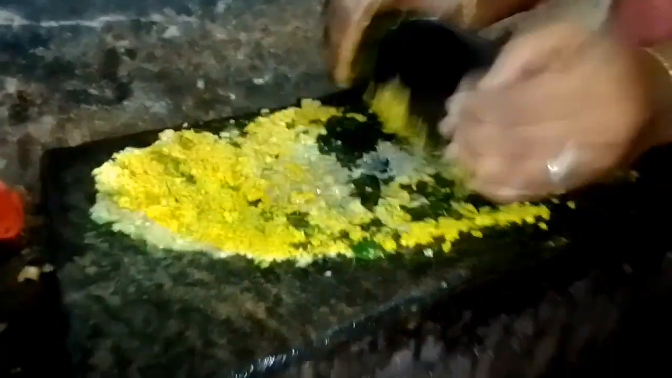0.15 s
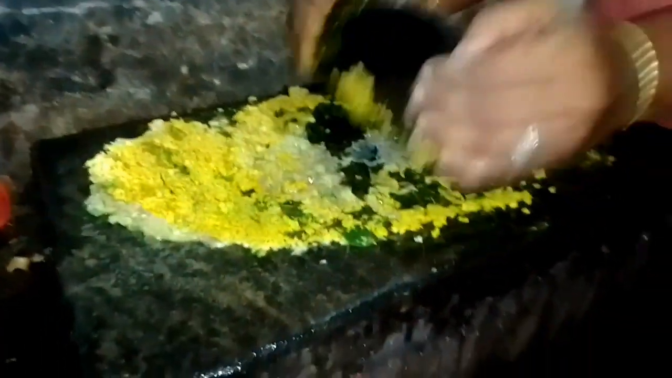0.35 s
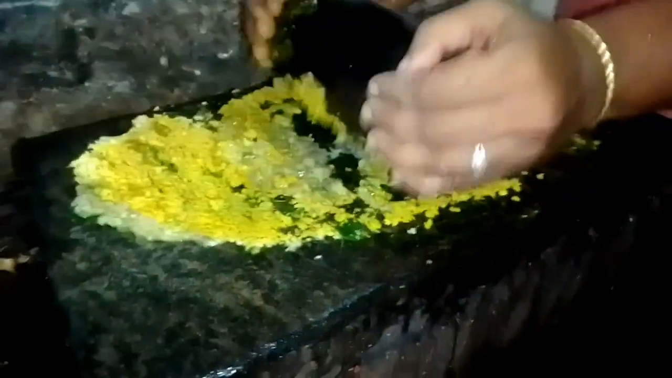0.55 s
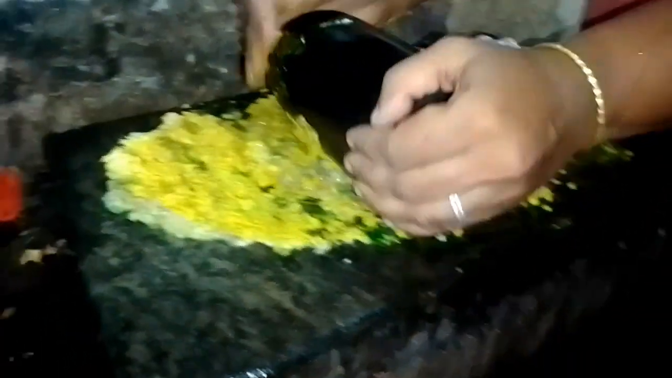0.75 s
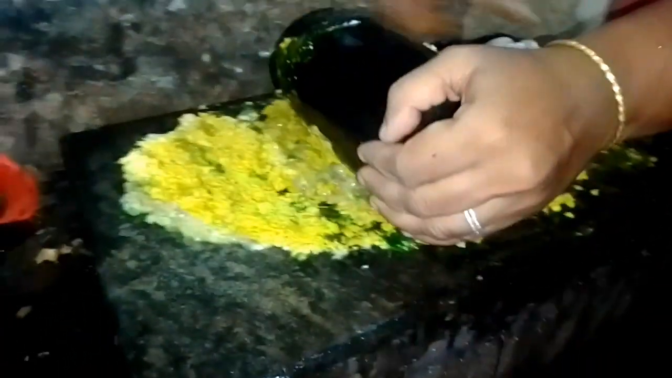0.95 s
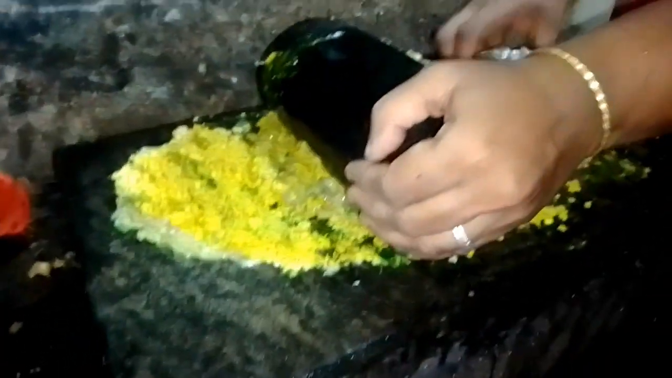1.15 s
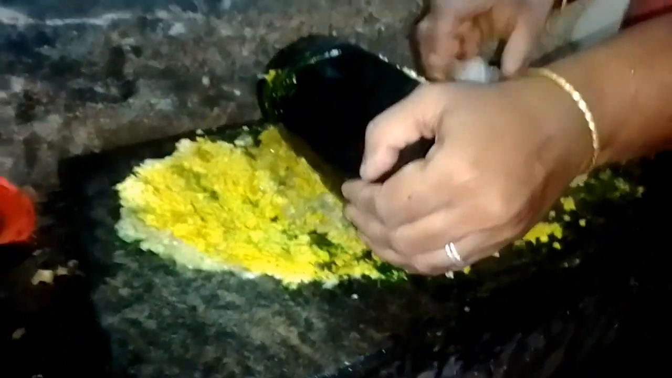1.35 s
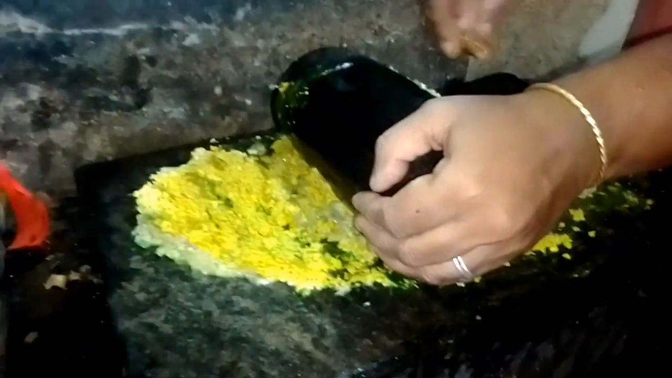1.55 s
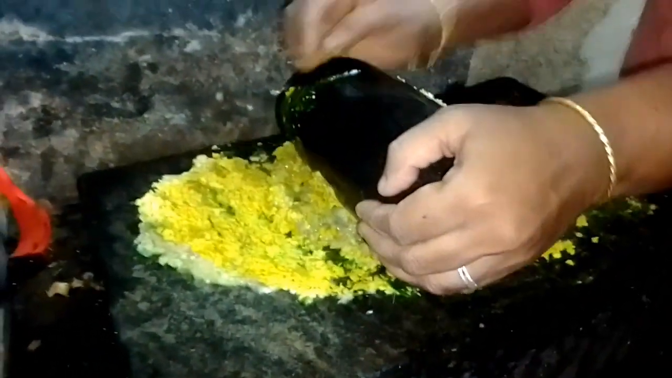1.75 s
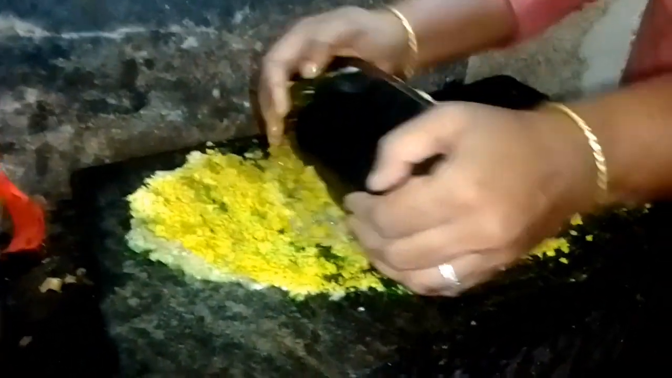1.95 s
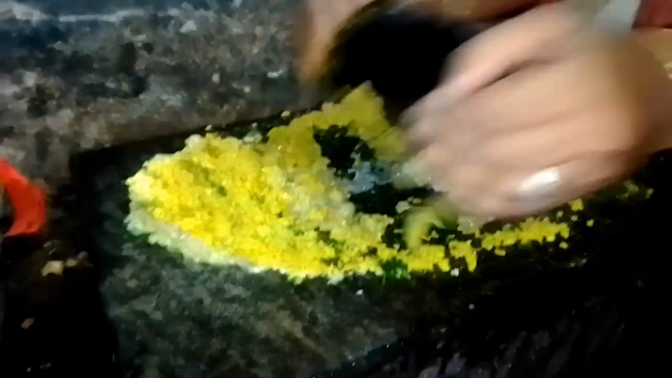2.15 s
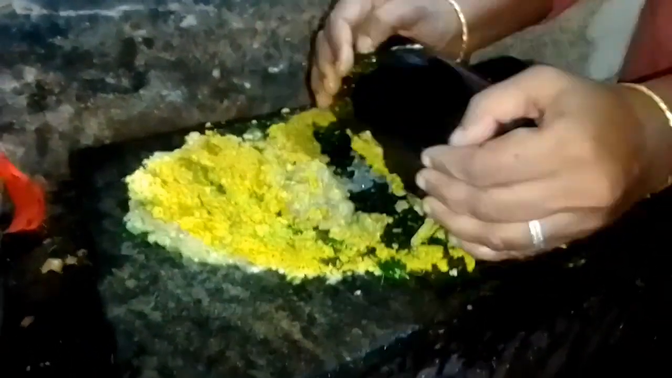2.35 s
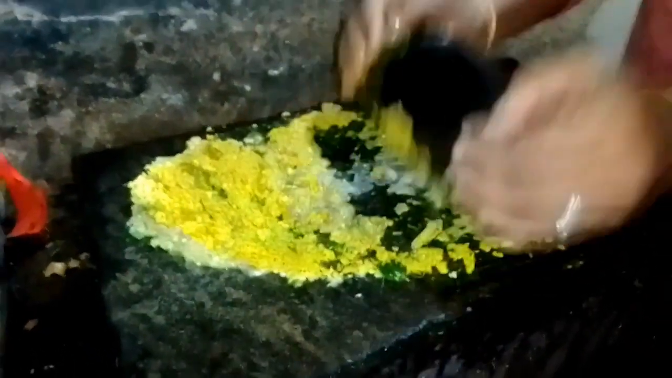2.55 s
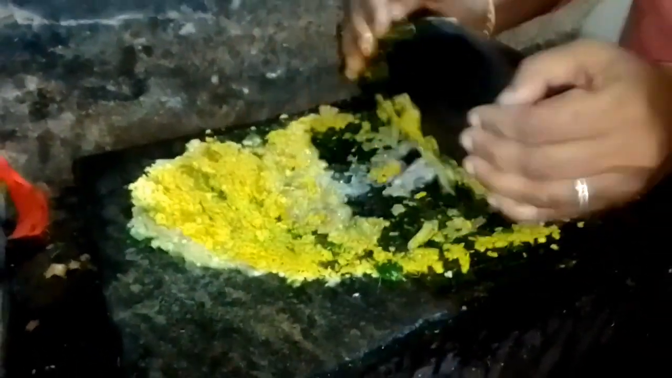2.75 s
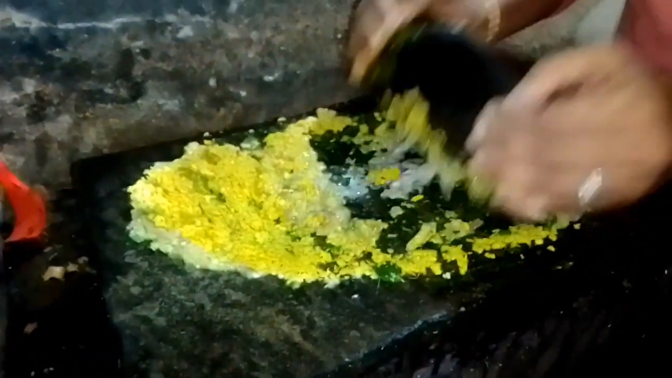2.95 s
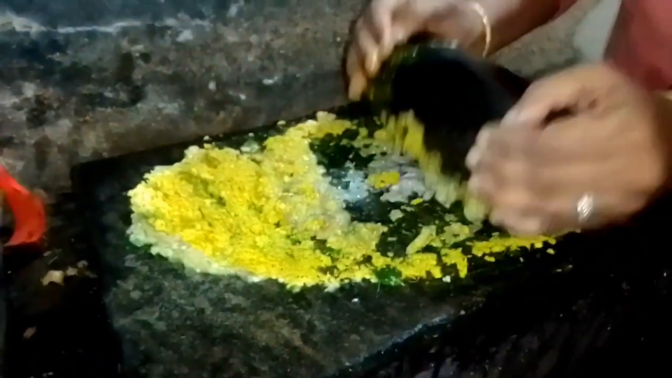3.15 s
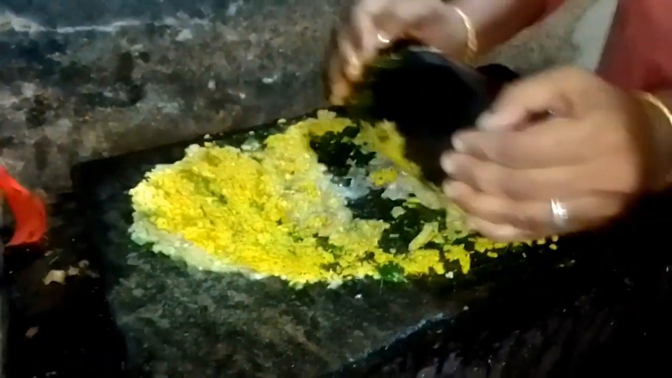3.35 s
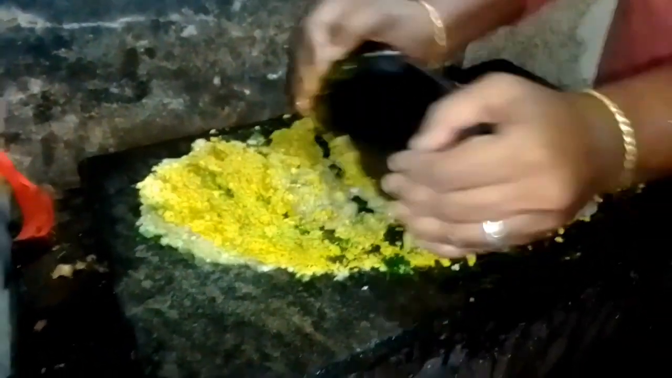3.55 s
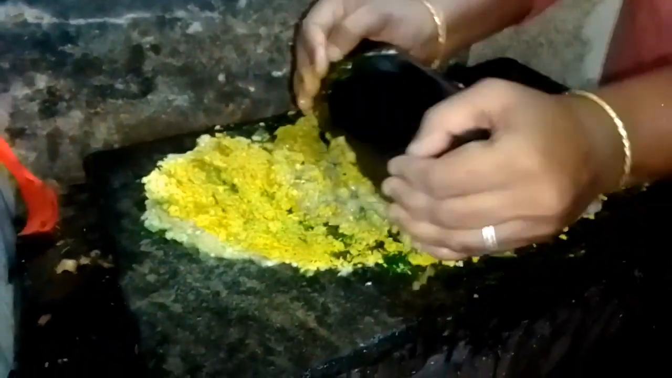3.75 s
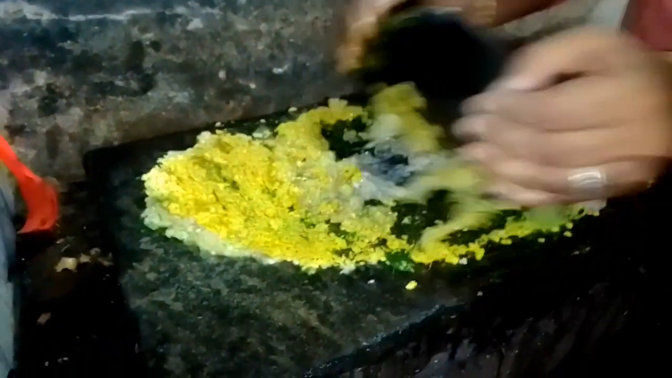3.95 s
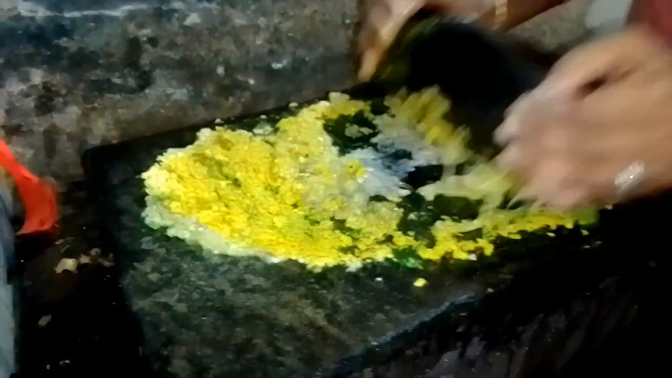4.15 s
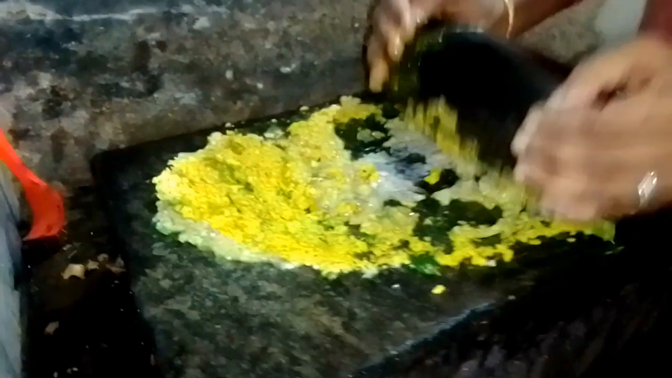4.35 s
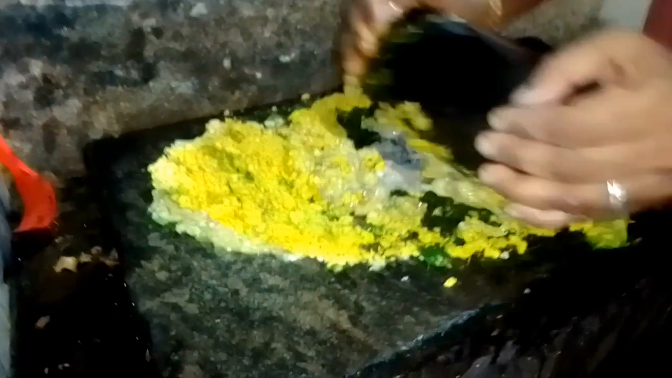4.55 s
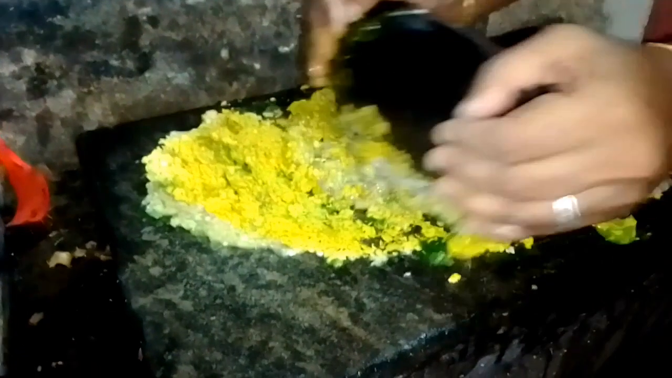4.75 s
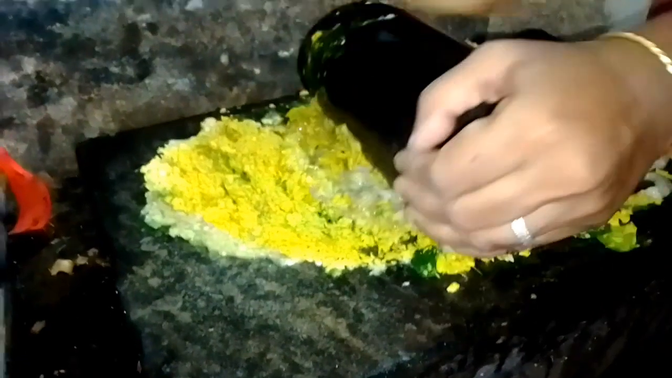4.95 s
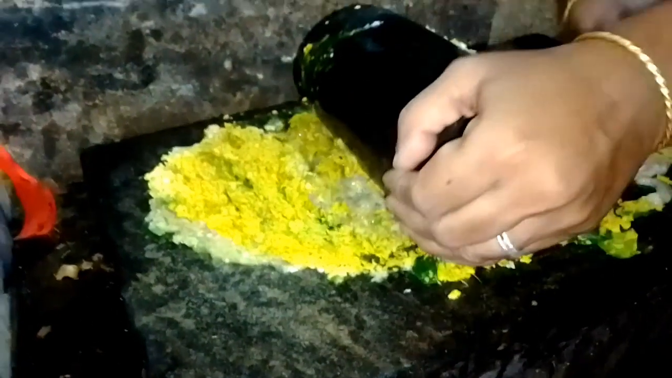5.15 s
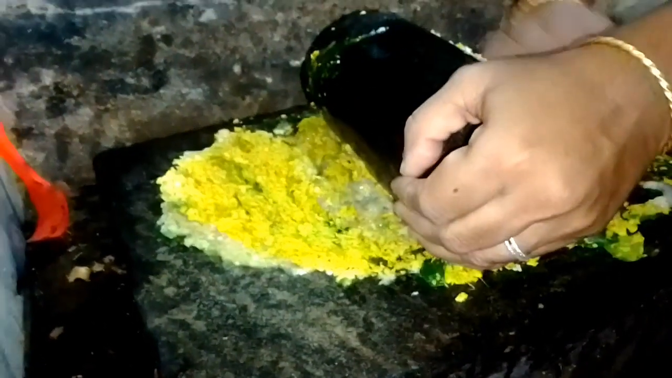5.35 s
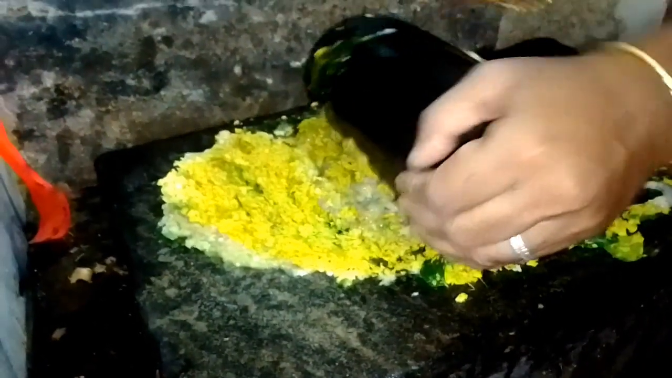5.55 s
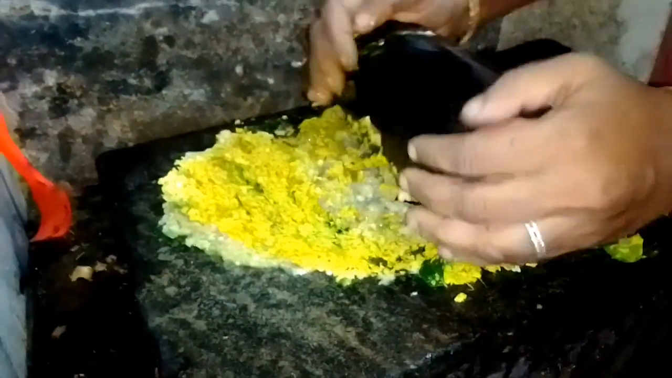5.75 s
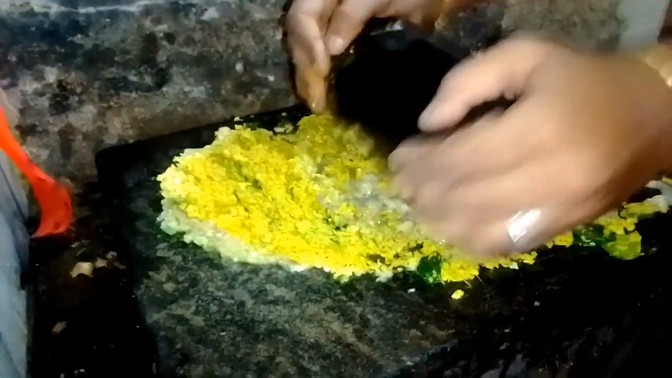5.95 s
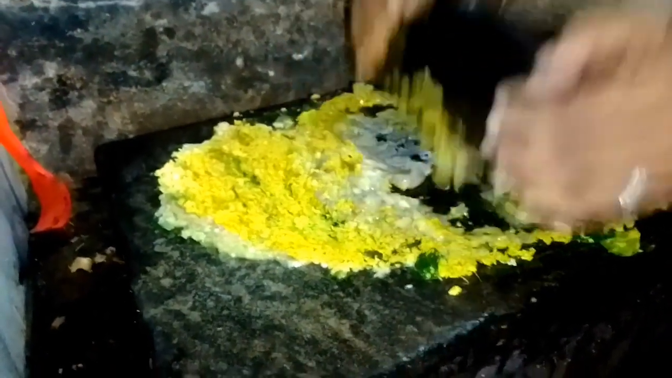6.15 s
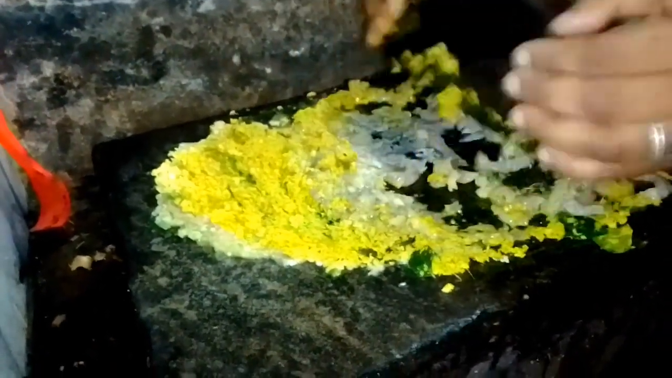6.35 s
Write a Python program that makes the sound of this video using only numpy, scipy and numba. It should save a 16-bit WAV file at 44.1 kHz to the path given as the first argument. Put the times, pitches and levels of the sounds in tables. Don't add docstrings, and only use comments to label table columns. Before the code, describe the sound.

A close, slightly boxy phone pickup in a small hard kitchen. A low, wavering pump-like hum and soft moving air stay behind throughout. At 0.1 s the pestle catches with a small gritty rattle, then taps at about 0.33, 0.56 and 0.8 s, each a short mid-pitched stone clack trailing into a juddering scrape. From 1 to 2.4 s it is quieter: wet paste rubbing, little crumb ticks, a thin palm squeak near 1.35. From 2.45 to 4.4 s taps return roughly every quarter second, strongest near 3.4 and 3.9, with skids and brief ringing. At 4.63 s one heavy blow, by far the loudest, booms hollowly through the slab with fast clattering rebounds, dying in under half a second. A lighter tap follows at 4.87, then soft rubs, a squeak around 5.4, sparse grainy snaps, and a faint double tap at 6.3 as the hum rises.

```python
import sys
import numpy as np
from scipy import signal
from scipy.fft import rfft, irfft
from scipy.io import wavfile
from scipy.ndimage import uniform_filter1d
from numba import njit

SR = 44100
rng = np.random.default_rng(int(sys.argv[2]) if len(sys.argv) > 2 else 0)


def generate_wav(signal):
    frames = np.transpose(np.atleast_2d(signal))
    scaled = np.clip(frames, -1, 1) * 32767
    pcm = np.round(scaled).astype(np.int16)
    wavfile.write(sys.argv[1], SR, pcm)


def volts_from_decibels(level):
    exponent = np.asarray(level, float) / 20
    return 10 ** exponent


N = 286209
T = np.arange(N) / SR

# (time [s], peak level [dB], ring [Hz], upper ring [Hz], treble [dB])
TAP_HITS = [(0.3346, -31.5, 1930, 2660, -14.5), (0.5607, -36, 1800, 2830, -4.5),
            (0.786, -50, 1490, 3420, -7), (0.7994, -43, 1960, 4480, -6), (2.4531, -38, 2150, 3750, -6),
            (2.7031, -34, 1690, 3600, -6), (2.9473, -29, 2140, 3180, -9.5), (3.1976, -30, 2030, 3750, -6),
            (3.4186, -27.5, 1960, 2940, -5.5), (3.6422, -43, 1980, 3800, -6),
            (3.8774, -26, 2106, 3280, -11.5), (4.171, -28.5, 1993, 3420, -11.5),
            (4.3956, -38, 1800, 4500, 0), (4.87, -37.5, 1580, 2750, -12.5),
            (6.3146, -42.5, 1680, 3450, -39), (6.3339, -41, 1780, 2800, -10)]
# (frequency [Hz], level [dB per Hz])
CRACK_COLOUR = [(300, -24.5), (900, 0.5), (2000, -4), (3500, 3.5), (4500, -4.5), (5500, -8.5),
                (8000, -20.5), (15000, -45)]
# (frequency [Hz], width [Hz], level [dB])
PESTLE_RINGS = [(1500, 150, -4.5), (1710, 84, -5), (1990, 90, -3), (2244, 53, -4), (2800, 140, -6),
                (3640, 170, -5)]
# (level against the tap [dB], frequency [Hz], width [Hz], die-away [s])
TAP_TRAILS = [(-20, 1920, 1180, 0.29), (-33, 4500, 4500, 0.11)]
# (time [s], peak level [dB], pitch
# [Hz])
CATCHES_AND_ECHOES = [(0.0938, -45, 1410), (0.0944, -31, 2550), (0.1037, -51, 2570), (0.107, -50, 1380),
                       (0.1293, -39, 2460), (0.1313, -49.5, 1570), (0.3361, -33, 1990), (0.3461, -39, 2020),
                       (0.3551, -40, 2070), (0.3638, -38, 2026), (0.3754, -42, 1990), (0.3858, -40, 2010),
                       (0.3924, -42, 1960), (0.4003, -45, 2000), (0.4126, -47, 2010), (0.4245, -48, 1980),
                       (0.4364, -54, 2010), (0.4992, -45, 1920), (0.564, -31.5, 1865), (0.571, -40, 1890),
                       (0.5818, -44, 1660), (0.591, -46, 1850), (2.4641, -41, 1990), (2.713, -45, 1720),
                       (2.7235, -46, 1600), (2.731, -47, 1640), (2.7441, -42, 1500), (2.7574, -46, 1570),
                       (2.7665, -44, 1470), (2.7902, -41, 1650), (2.7974, -43, 1660), (2.8113, -41.5, 1590),
                       (2.9611, -42, 1860), (2.9667, -45, 1610), (2.9756, -47, 1850), (3.2045, -39, 1850),
                       (3.2135, -39, 1820), (3.2247, -40, 1970), (3.2318, -43, 1960), (3.2461, -39.5, 1820),
                       (3.2566, -43, 1740), (3.4239, -31.5, 1940), (3.435, -45, 2600), (3.4399, -38, 1940),
                       (3.4445, -43, 2830), (3.4559, -42, 1910), (3.467, -44, 1880), (3.4745, -46, 2710),
                       (3.48, -43, 1850), (3.8894, -44, 2100), (3.8995, -41, 2160), (3.909, -47, 2060),
                       (3.9304, -45, 2020), (4.1842, -37, 2200), (4.1942, -40, 2035), (4.2009, -43, 2040),
                       (4.2119, -46, 2070), (4.2265, -42, 2040), (4.4069, -43, 1930), (4.4246, -47, 1990),
                       (1.327, -58, 1500), (1.335, -53, 1700), (1.348, -52, 2000), (2.4535, -41, 2000),
                      (2.4545, -45, 2700), (2.459, -43, 2300), (2.4695, -43, 1500), (2.475, -47, 2000),
                      (2.483, -48, 2100), (2.5005, -49, 1800), (3.6385, -48, 1990), (3.645, -46, 1990),
                      (3.651, -45, 1990), (3.654, -49, 1400), (3.659, -53, 1100), (3.718, -55, 1500),
                      (3.792, -60, 1700), (3.801, -57, 1700), (3.809, -58, 1650), (1.088, -49, 1600),
                      (1.069, -54, 2700), (.564, -41, 1500), (.62, -47, 1950), (6.311, -50, 2000),
                      (6.321, -48, 1800), (4.33, -53, 1600), (2.87, -51, 1600), (2.895, -53, 1600),
                      (6.345, -51, 1750), (6.358, -51, 1850), (4.174, -40, 1500), (2.835, -47, 1600),
                      (4.56, -52, 1500), (4.395, -38, 1950), (4.399, -40, 1650), (4.416, -47, 2100),
                      (4.445, -51, 2200), (4.494, -50, 1600)]
# (time [s], peak level [dB], pitch [Hz])
GRAIN_SNAPS = [(1.14, -58, 3800), (1.16, -58, 1800), (2.7095, -36, 3500), (3.1985, -36, 3600),
               (4.3938, -30, 3700), (4.3992, -37, 2000), (5.803, -52, 2600), (5.83, -56, 2800),
               (5.846, -56, 2600), (5.884, -58, 1600), (5.962, -63, 4000), (5.995, -61, 4300),
               (6.02, -55, 2600), (6.033, -61, 4500), (6.076, -61, 3500), (6.1, -63, 3800),
               (2.949, -36, 3200), (3.4185, -33, 3000), (4.038, -52, 1800), (1.235, -53, 1600),
               (4.871, -45, 3800), (.099, -46, 4500), (.329, -45, 3800), (6.33, -47, 3600)]
# (time [s], peak level [dB], pitch [Hz], treble [dB])
CRUMB_TICKS = [(0.0928, -35, 2580, -20), (0.128, -41, 2520, -20), (0.617, -42, 1970, -26),
               (0.8504, -45, 1940, -18), (0.948, -54, 1390, -43), (0.9838, -51, 1600, -27),
               (1.066, -48, 1660, -28), (1.2338, -49.5, 1570, -26), (1.325, -52, 1580, -23),
               (1.5988, -48.5, 1510, -24), (1.974, -45.5, 1580, -28), (2.2984, -43, 1970, -30),
               (3.715, -49, 1380, -16), (4.0377, -50, 1640, -29), (4.3117, -52, 1960, -16),
               (4.539, -46, 1550, -28), (2.4625, -44, 2300, 2), (5.088, -53, 1600, -22),
               (5.1665, -52, 2190, -24), (5.591, -51, 1560, -24), (5.655, -53, 1440, -19),
               (5.781, -53, 1920, -16), (5.8038, -51, 1890, -22), (6.0032, -44.5, 1500, -12),
               (6.02, -58, 1520, -16), (6.249, -51, 1670, -22)]
# (time [s], level [dB], push length [ms])
BLOW_PUSHES = [(4.6332, -28, 0.55), (4.6352, -13.5, 1.27), (4.639, -17.5, 0.93), (4.6420, -15.5, 0.43),
               (4.650, -21.5, 0.67), (4.6595, -21.5, 0.53), (4.6655, -25.5, 0.4), (4.673, -27.5, 0.47),
               (4.6765, -27, 0.55), (4.689, -27, 0.8), (4.6955, -27.5, 0.47), (4.702, -28, 0.75),
               (4.7055, -28, 1.4), (4.719, -35, 0.57), (4.726, -38, .5)]
# (time [s], level [dB], decay [ms])
FIRST_CONTACT = (4.6318, -26.5, 4.3)
# (frequency [Hz], level [dB per Hz])
PUSH_COLOUR = [(80, -38), (170, -22), (230, -6.5), (500, -4.5), (1100, 1.5), (1900, 6.5), (2600, -5),
               (3100, -15), (4000, -30), (4500, -23), (15000, -62)]
# (frequency [Hz], level [dB], die-away [s])
SLAB_RINGS = [(225.7, -26.5, 0.23), (254, -33, 0.39), (308, -36, 0.6), (389, -22.5, 0.4),
              (489.2, -30, 0.38), (572, -38, 0.29), (680, -33, 0.24), (791, -48, 0.25), (923, -34, 0.26),
              (1044, -35.5, 0.5), (1131, -29.5, 0.42), (1162, -30.5, 0.31), (1290, -38, 0.5),
              (1338, -36, .3), (1423, -33.5, 0.4), (1464, -33, 0.24), (1577, -33, 0.33), (1780, -38, 0.24),
              (1879, -36, .15), (2110, -41, 0.29), (2394, -42, 0.3), (2644, -48, 0.27)]
# (time [s], level [dB], die-away [s])
FLOOR_THUMPS = [
    (3.2, -86, 0.55),
    (3.43, -75.5, 0.55),
    (3.88, -80.5, 0.43),
    (4.4, -78.5, 0.76),
    (4.639, -68, 0.72),
]
# (level above its thump [dB], frequency [Hz], width [Hz], die-away [s])
SLAB_GROANS = [(22.5, 700, 380, 0.31), (12, 246, 68, 0.43)]
# (time [s], level [dB], start pitch
# [Hz], width [Hz], die-away [s])
SKIDS_AND_SCRAPES = [(.097, -58, 2560, 90, .3), (0.091, -55, 1500, 900, 0.3), (.13, -54, 2570, 80, 0.25),
                     (.093, -55.5, 4970, 6000, 0.058), (.345, -51, 2030, 60, 0.95), (.57, -50, 1940, 120, 0.19),
                     (.565, -46.5, 1520, 149, 0.14), (.79, -58, 3700, 4000, 0.23), (1.06, -53, 1600, 250, 0.28),
                     (1.325, -60.5, 614, 230, 0.15), (2.3, -58, 2070, 500, 0.32), (2.703, -50.5, 1560, 340, 0.59),
                     (2.786, -49.5, 1650, 170, 0.24), (2.948, -48, 1250, 600, 0.3), (3.205, -52, 1960, 160, 0.34),
                     (3.42, -48, 1940, 300, 0.56), (3.42, -48, 2800, 420, 0.29), (3.782, -65, 1690, 150, 0.65),
                     (4.173, -53, 2080, 342, 0.42), (4.175, -53, 2980, 150, 0.25), (4.41, -60, 2320, 130, 0.62),
                     (4.9, -66, 476, 71, 0.83), (6.015, -69, 3550, 2960, 0.23),
                     (.329, -47.5, 8000, 4800, 0.041), (.124, -56.5, 4600, 6000, .04),
                 (3.2, -47, 1480, 340, 0.25), (4.64, -49, 3460, 990, 0.26), (1, -64.5, 1050, 1100, 0.42),
                 (3.79, -65, 630, 240, 0.36), (4.33, -63.5, 560, 230, 0.54), (4.488, -62, 1600, 600, 0.13),
                 (4, -62, 1600, 710, 0.18), (5.8, -63, 2800, 2300, .08), (5.84, -66, 2800, 2500, .08),
                 (5.345, -65.5, 900, 770, 0.38), (5.655, -65, 1300, 1300, 0.3),
                 (6.07, -63.5, 910, 850, 0.65), (6.31, -63, 630, 200, 0.34), (.8, -61, 5200, 1500, .12),
                     (3.205, -53, 2480, 55, 0.33), (2.705, -56, 1000, 340, .25), (4.2, -55.5, 2060, 90, 0.4),
                 (3.88, -50.5, 2760, 130, 0.28), (3.88, -56, 1100, 340, 0.22),
                 (2.452, -57, 3850, 150, 0.12), (2.453, -50, 1700, 1500, 0.2), (2.95, -55, 2050, 100, .3),
                 (2.95, -61, 3100, 80, 0.22), (3.412, -50.5, 248, 56, 0.22), (3.639, -55, 1300, 700, 0.14),
                 (.34, -57.5, 2900, 300, .3), (1.5, -60, 1620, 200, .1), (2.33, -60, 2250, 250, .15),
                 (6.1, -66, 584, 68, .3), (.1, -62, 1980, 580, .5), (.59, -61, 1540, 150, 0.18),
                 (3.25, -57, 1860, 200, 0.42), (4.875, -56, 2200, 900, 0.25), (4.95, -62, 300, 33, 0.8)]
# (time [s], level [dB])
HAND_PRESSURE = [(0.0, -71), (0.14, -62.5), (0.4, -78), (0.49, -69), (0.78, -64), (1.43, -67),
                 (2.06, -73.5), (2.33, -65), (2.75, -64), (2.89, -64.5), (3.0, -74), (3.25, -68),
                 (3.38, -69), (4.6, -67), (4.72, -60), (4.93, -69), (5.15, -72), (6.49, -65)]
# (frequency [Hz], width [Hz], level [dB])
PASTE_BANDS = [(1800, 900, 0.5), (720, 640, -5)]
# (time [s], length [s], pitch [Hz], level [dB], upper band level [dB])
PALM_SQUEAKS = [
    (0.476, 0.21, 1860, -63, -68),
    (1.335, 0.2, 1790, -59, -69),
    (2.28, 0.15, 1970, -76, -72),
    (3.382, 0.091, 1850, -59.5, -64),
    (4.689, 0.048, 1800, -52, -60),
    (5.368, 0.19, 1810, -60, -66),
]
# (time [s], rumble level [dB])
PUMP_LOAD = [(0.0, -83), (.45, -73), (.75, -69), (1.17, -65.5), (1.28, -80.5), (1.62, -71.5), (1.95, -81.5),
             (2.3, -80), (2.8, -68), (3.3, -69), (3.5, -69.5), (3.76, -69), (4.4, -66), (5.01, -68.5),
             (5.22, -78), (5.6, -83), (6.2, -81), (6.49, -67)]
# (frequency [Hz], width [Hz], level [dB])
PUMP_PEAKS = [(297, 52, 4.5), (195.7, 11, -9.5)]
# (time [s], pitch [Hz], level [dB])
PUMP_TONES = [
    [(3.0, 321.7, -65), (3.15, 319, -52), (3.35, 317, -48), (3.42, 314.6, -59), (3.53, 307, -60),
     (3.58, 303, -78)],
    [(5.85, 309, -72), (6.1, 300, -69), (6.35, 295.6, -62), (6.49, 291, -56)],
    [(5.85, 381, -72), (6.1, 386.7, -69.5), (6.35, 384, -71), (6.49, 400, -57)],
    [(1.25, 423, -81), (1.55, 422, -69), (1.8, 416, -84)],
    [(4.75, 424, -56.5), (5.0, 425, -70), (5.15, 424, -82)],
    [(3.775, 330, -66), (3.793, 330, -53), (3.801, 330, -60), (3.808, 335, -51), (3.825, 335, -68)],
    [(5.2, 432, -84), (5.45, 430, -71), (5.62, 428, -84)],
    [(2.74, 360, -76), (2.83, 358, -62), (2.92, 356, -76)],
]
# (frequency [Hz], level [dB per Hz])
HISS_COLOUR = [(12, -19), (28, 4), (55, -6.5), (150, -20), (230, -5.5), (400, 1), (1200, -2), (1700, -1.5),
               (2850, -6.5), (3260, -11), (5280, -20), (14300, -22.5), (15500, -27)]
# (frequency [Hz], die-away [s])
ROOM_DECAY = [(150, 0.36), (400, 0.27), (1000, 0.27), (2000, 0.12), (4000, 0.064), (8000, 0.086),
              (13000, 0.38)]


def taps(ring_t60=0.024, upper_width_hz=550):
    out, t = np.zeros(N), T[:2 ** 13]
    ring_lag = int(0.00149 * SR)
    top_lag = int(0.005 * SR)
    for s, db, hz, upper_hz, treble_db in TAP_HITS:
        push = grit(t, rise_ms=3.9, decay_ms=3.6)
        crack = colour(push + volts_from_decibels(-11) * grit(t, rise_ms=2.5, decay_ms=10.0), CRACK_COLOUR)
        body = stone(band(crack, 1290, 1600), plain_db=-11.5)
        ring = peak(band(push, hz, 3 / ring_t60)) + volts_from_decibels(-4.5) * peak(body)
        top = np.roll(peak(band(crack, 10600, 6000)), top_lag)
        upper_ring = peak(band(push, upper_hz, upper_width_hz))
        treble = peak(band(crack, 4480, 2500)) + volts_from_decibels(-13.5) * top + volts_from_decibels(4.0) * upper_ring
        thud = peak(band(band(push, 770, 640), 770, 640))
        tap = np.roll(ring, ring_lag) + volts_from_decibels(treble_db + 3.0) * treble + volts_from_decibels(-19) * thud
        add(out, s - .0055, volts_from_decibels(db - 7) * tap)
    return out


def grit(t, rise_ms, decay_ms):
    swell = (1 - np.exp(-t * 1000 / rise_ms)) ** 2
    return rng.standard_normal(len(t)) * swell * np.exp(-t * 1000 / decay_ms)


def stone(x, plain_db=-9):
    return volts_from_decibels(plain_db) * x + sum(volts_from_decibels(db) * band(x, hz, width) for hz, width, db in PESTLE_RINGS)


def approach(swell_ms=6, below_db=-28):
    out, t = np.zeros(N), T[:2 ** 11]
    for s, db, *_ in TAP_HITS:
        squeeze = level(band(slips(len(t), grain_db=3), 2000, 1500), db + below_db)
        add(out, s - .003 - t[-1], squeeze * np.exp((t - t[-1]) * 1000 / swell_ms))
    return out


def short_pulses(pulse_rows, rise_ms=1.5, decay_ms=2.21):
    out, t = np.zeros(N), T[:2 ** 10]
    shape = peak((1 - np.exp(-t * 1000 / rise_ms)) ** 2 * np.exp(-t * 1000 / decay_ms))
    for s, db, hz in pulse_rows:
        add(out, s - np.argmax(shape) / SR, volts_from_decibels(db - 0.9) * shape * np.sin(2 * np.pi * hz * t))
    return out


def ticks(width_hz=350):
    out, t = np.zeros(N), T[:2 ** 11]
    for s, db, hz, treble_db in CRUMB_TICKS:
        push = grit(t, rise_ms=0.36, decay_ms=2.4)
        ring = peak(band(band(push, hz, width_hz), hz, 3 * width_hz))
        snap = ring + volts_from_decibels(treble_db - 4) * peak(band(push, 4500, 3000))
        add(out, s - .0015, volts_from_decibels(db - 4.0) * snap)
    return out


def blow():
    pushes, tick, t = np.zeros(N), np.zeros(N), T[:2 ** 10]
    for s, db, push_ms in BLOW_PUSHES:
        add(pushes, s - .002, -volts_from_decibels(db) * np.exp(-((t - .002) * 4000 / push_ms) ** 2))
    boom = sum(volts_from_decibels(db) * peak(band(pushes, hz, 2.9 / t60)) for hz, db, t60 in SLAB_RINGS)
    s, db, decay_ms = FIRST_CONTACT
    add(tick, s, volts_from_decibels(db) * rng.standard_normal(len(t)) * np.exp(-t * 1000 / decay_ms))
    tick_colour = [(2500, -2), (3500, 8.5), (5000, -4.0), (8000, -12.0), (15000, -19.5)]
    return volts_from_decibels(7.5) * colour(pushes, PUSH_COLOUR) + boom, colour(tick, tick_colour)


def thumps(hz=108, width_hz=35):
    out, t = np.zeros(N), T[:SR // 2]
    for s, db, t60 in FLOOR_THUMPS:
        boom = level(band(band(rng.standard_normal(len(t)), hz, width_hz), hz, width_hz), db)
        add(out, s, boom * (1 - np.exp(-t / 0.014)) * volts_from_decibels(-60 * t / t60))
    return out


def skids(sag_per_s=0.28, sag_s=0.3):
    out, t = np.zeros(N), T[:2 ** 14]
    trails = [(tap[0] - .003, tap[1] + db, *rest) for tap in TAP_HITS for db, *rest in TAP_TRAILS]
    groans = [(s - .006, thump_db + db, *rest)
              for s, thump_db, _ in FLOOR_THUMPS[:-1] for db, *rest in SLAB_GROANS]
    for s, db, hz, width_hz, t60 in trails + groans + SKIDS_AND_SCRAPES:
        centre = hz * (1 - sag_per_s * np.minimum(t, sag_s))
        hollow = band(band(slips(len(t), grain_db=3.5), centre, width_hz), centre, 2.2 * width_hz)
        if width_hz > 350:
            hollow = stone(hollow)
        add(out, s, level(hollow, db) * (1 - np.exp(-t / 0.0019)) ** 2 * volts_from_decibels(-60 * t / t60))
    return out


def slips(count, grain_db):
    return rng.standard_normal(count) * volts_from_decibels(grain_db * np.minimum(rng.exponential(size=count), 5))


def drag(patchy_db=3):
    out, (pressure_db,) = 0, read(HAND_PRESSURE)
    for hz, width_hz, db in PASTE_BANDS:
        grains = slips(N, grain_db=2.5) * volts_from_decibels(patchy_db * walk(30) + 3.55 * walk(9))
        squelch = level(band(band(grains, hz, width_hz), hz, 1.74 * width_hz), -5.5)
        out = out + volts_from_decibels(pressure_db + db) * squelch
    return out


def squeaks(width_hz=65, upper_width_hz=420, upper_ratio=2.166):
    out = np.zeros(N)
    for s, length, hz, db, upper_db in PALM_SQUEAKS:
        upper_hz = upper_ratio * hz
        t = T[:int(2 * length * SR)]
        arch = hz + 30 * np.sin(np.pi * np.minimum(t / length, 1)) - 100 * t
        low = band(band(rng.standard_normal(len(t)), arch, width_hz), hz, 4 * width_hz)
        high = band(rng.standard_normal(len(t)), upper_hz, upper_width_hz)
        high = level(band(high, upper_hz, 1.5 * upper_width_hz), upper_db)
        both = level(low, db) + high * np.exp(-(.9 * t / length) ** 4)
        add(out, s, both * (1 - np.exp(-t / 0.018)) * np.exp(-(1.15 * t / length) ** 3))
    return out


def hum(drone_hz=337.7, drone_width_hz=28.4, steady_hz=342.1):
    rumble_db, = read(PUMP_LOAD)
    extra_load_db = rumble_db + 72.5
    drone_db = -66.5 + 0.51 * extra_load_db
    steady_db = -64 + 0.4 * extra_load_db
    wheeze = band(rng.standard_normal(N), drone_hz, drone_width_hz)
    drone = level(band(wheeze, drone_hz, 3 * drone_width_hz), -1.4)
    rumble = signal.sosfilt(signal.butter(6, [190, 325], "band", fs=SR, output="sos"), rng.standard_normal(N))
    peaks = sum(volts_from_decibels(db) * band(rumble, hz, width) for hz, width, db in PUMP_PEAKS)
    rumble = volts_from_decibels(-12.5) * rumble + peaks
    steady = volts_from_decibels(steady_db + 2.0 * walk(5.97)) * np.sin(2 * np.pi * steady_hz * T + 0.4 * walk(5.0))
    bass = level(band(rumble + 0.41 * rng.standard_normal(N), 117, 21), -94.0)
    out = steady + volts_from_decibels(drone_db) * drone + volts_from_decibels(rumble_db) * level(rumble, 2.1) + bass
    for tone in PUMP_TONES:
        hz, db = read(tone)
        sounding = (T > tone[0][0]) & (T < tone[-1][0])
        out = out + sounding * volts_from_decibels(db + 2 * walk(20)) * np.sin(2 * np.pi * np.cumsum(hz) / SR)
    return out


def background_hiss():
    return level(colour(rng.standard_normal(N), HISS_COLOUR), -68.5) * volts_from_decibels(0.57 * walk(9.6))


def room(x, build_ms):
    t = T[:SR]
    tail = sum(band(rng.standard_normal(SR), hz, hz) * volts_from_decibels(-60 * t / t60) / np.sqrt(hz)
               for hz, t60 in ROOM_DECAY)
    tail = tail * (1 - np.exp(-t / (build_ms / 1000)))
    return signal.fftconvolve(x, tail / np.sqrt(np.sum(tail ** 2)))[:N]


def floor_echo(x):
    return x - 0.52 * band(x, 429, 55)


def high_pass(x, order, hz):
    return signal.sosfilt(signal.butter(order, hz, "high", fs=SR, output="sos"), x)


def level(x, db):
    return x * volts_from_decibels(db) / np.sqrt(np.mean(x ** 2))


def peak(x):
    return x / np.max(np.abs(x))


def read(table):
    s, *columns = np.transpose(table)
    return [np.interp(T, s, c) for c in columns]


def colour(x, points):
    hz, db = np.transpose(points)
    size = 2 ** 11
    log_hz = np.log(np.fft.rfftfreq(size, 1 / SR) + 1)
    log_gain = np.interp(log_hz, np.log(hz), db) * np.log(10) / 20
    cepstrum = irfft(log_gain)
    cepstrum[1:size // 2] *= 2
    cepstrum[size // 2 + 1:] = 0
    return signal.fftconvolve(x, irfft(np.exp(rfft(cepstrum))))[:len(x)]


@njit
def svf(x, hz, width):
    y, b, l = np.empty(len(x)), 0., 0.
    for i in range(len(x)):
        g, k = np.tan(np.pi * hz[i] / SR), width / hz[i]
        v = (b + g * (x[i] - l)) / (1 + g * (g + k))
        b, l, y[i] = 2 * v - b, l + 2 * g * v, k * v
    return y


def band(x, hz, width_hz):
    return svf(x, hz * np.ones(len(x)), float(width_hz))


def walk(rate):
    k = int(SR / rate)
    held = np.repeat(rng.standard_normal(N // k + 1), k)
    return 1.44 * uniform_filter1d(uniform_filter1d(held, k), k)[:N]


def add(out, s, x):
    i = int(s * SR)
    out[i:i + len(x)] += x[:len(out) - i]


def scene():
    near = taps() + ticks()
    rub = skids() + squeaks() + drag() + approach()
    rub = rub + short_pulses(CATCHES_AND_ECHOES) + short_pulses(GRAIN_SNAPS, rise_ms=.25, decay_ms=.45)
    thud, tick = blow()
    wet = volts_from_decibels(-8.0) * room(near + tick, build_ms=7.8)
    wet = wet + volts_from_decibels(-14.5) * room(rub, build_ms=4.4)
    wet = wet + volts_from_decibels(-15) * room(high_pass(thud, 4, 240), build_ms=4.0)
    close = high_pass(floor_echo(near + rub + thud + tick + wet), 8, 178)
    return (close + thumps() + hum() + floor_echo(background_hiss()))[None]


def low_pass(x):
    return signal.sosfilt(signal.butter(12, 15920, fs=SR, output="sos"), x)


def record(dry, ceiling=.55, offset=-.0002):
    phone = high_pass(ceiling * np.tanh(dry / ceiling), 2, 62)
    return low_pass(phone + offset)


dry = scene()
out = record(dry)
generate_wav(out)
```